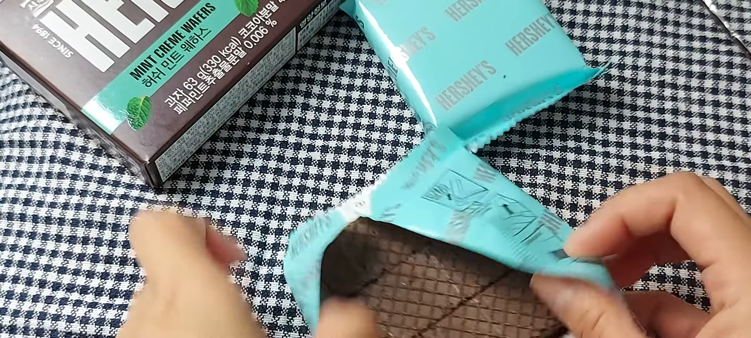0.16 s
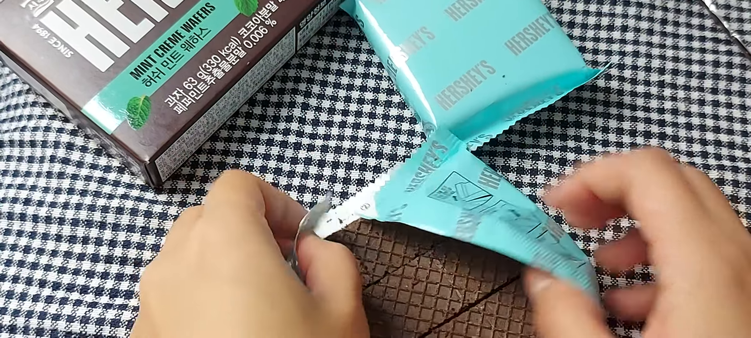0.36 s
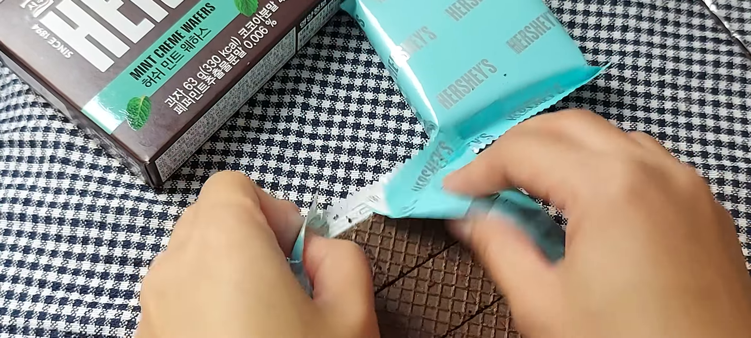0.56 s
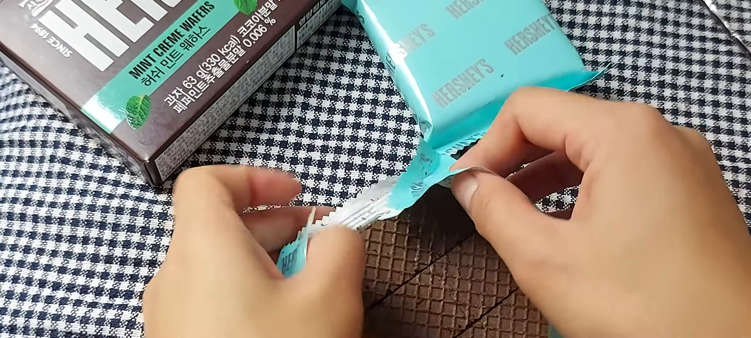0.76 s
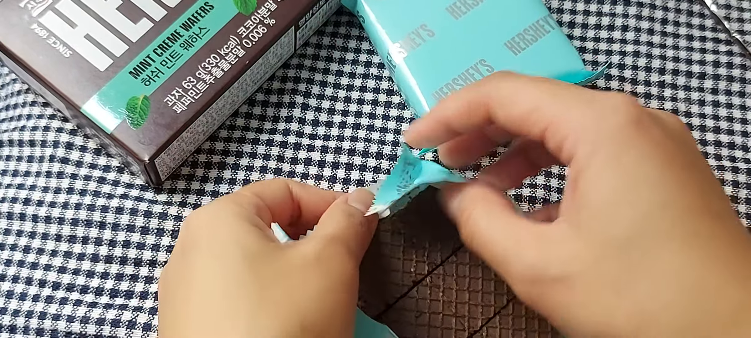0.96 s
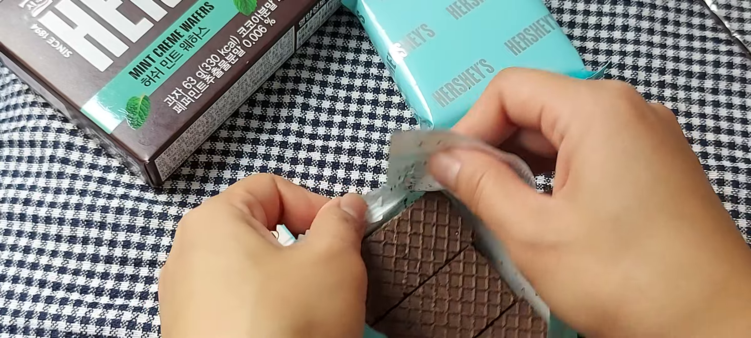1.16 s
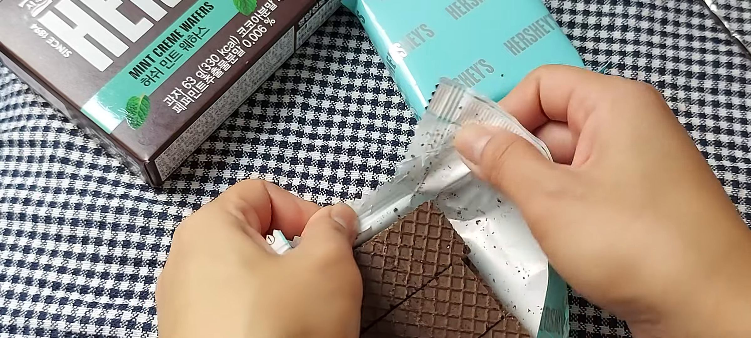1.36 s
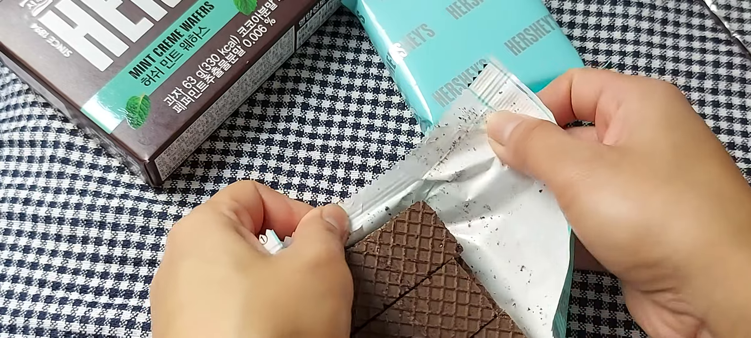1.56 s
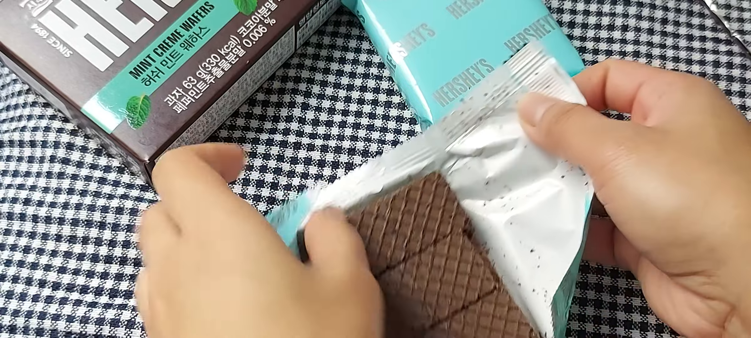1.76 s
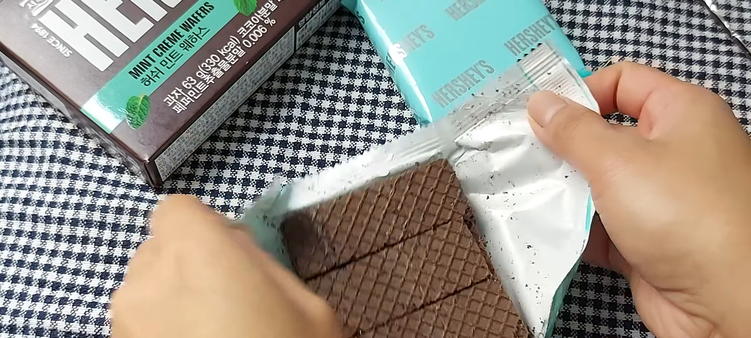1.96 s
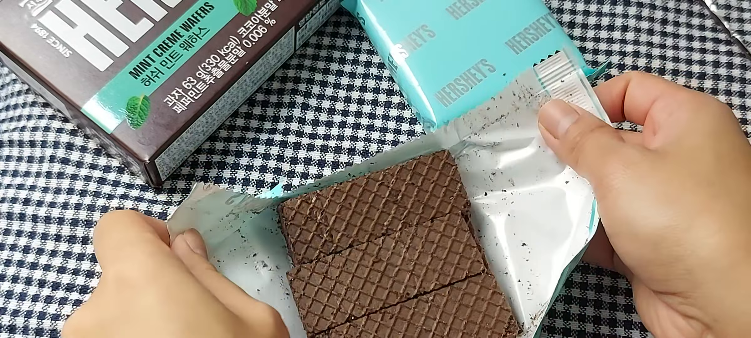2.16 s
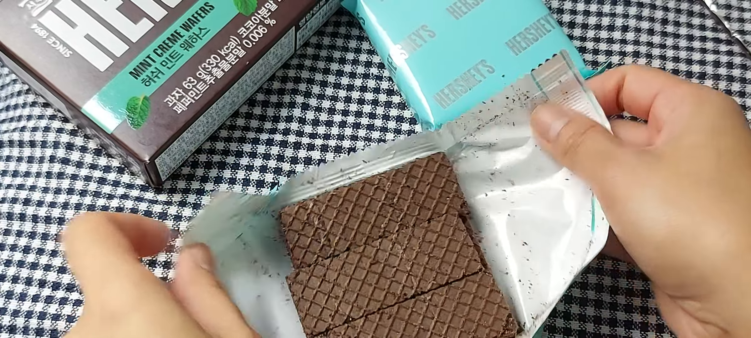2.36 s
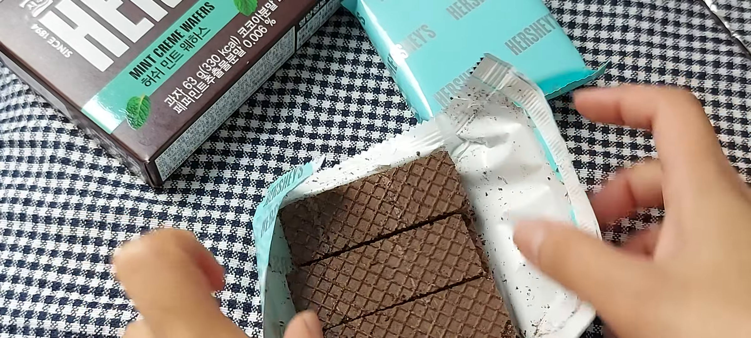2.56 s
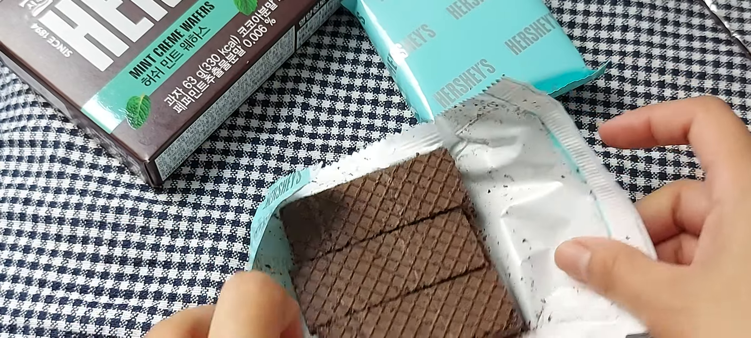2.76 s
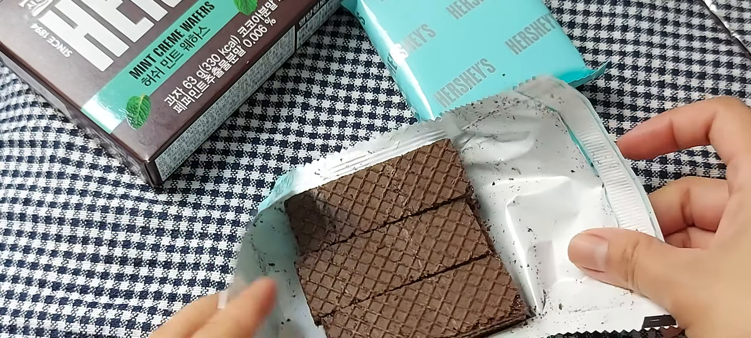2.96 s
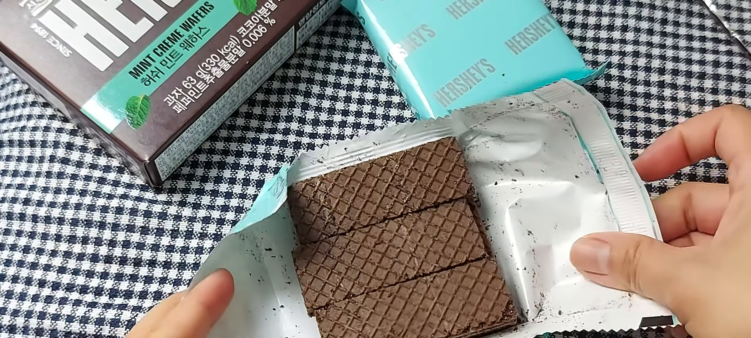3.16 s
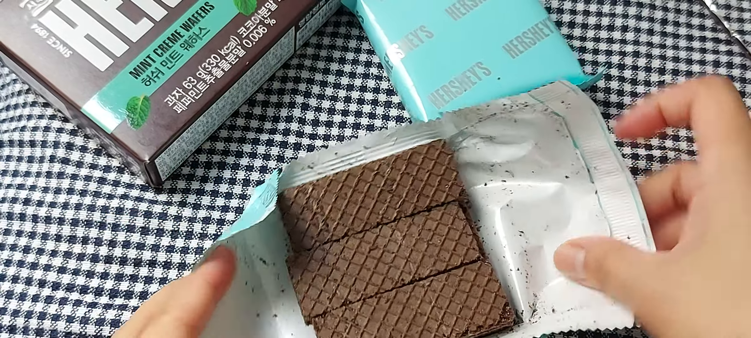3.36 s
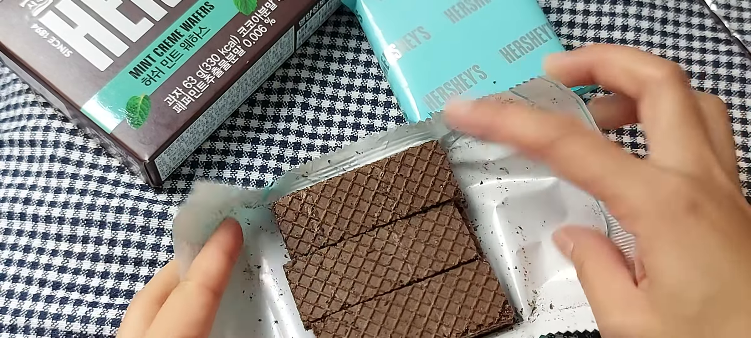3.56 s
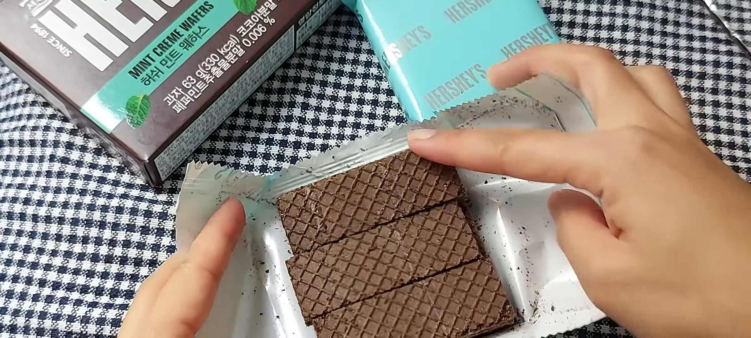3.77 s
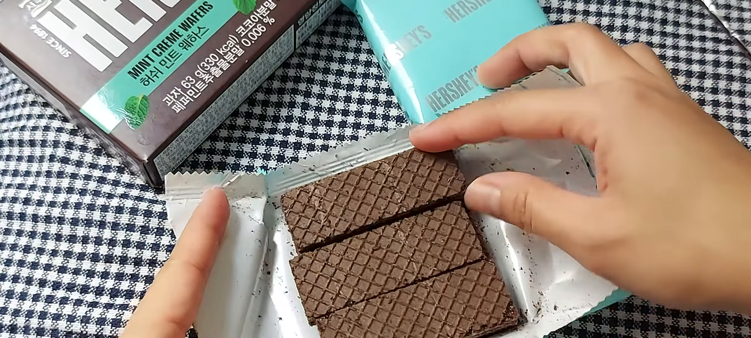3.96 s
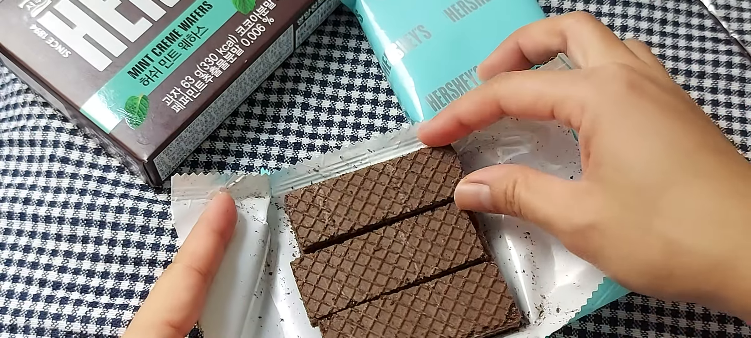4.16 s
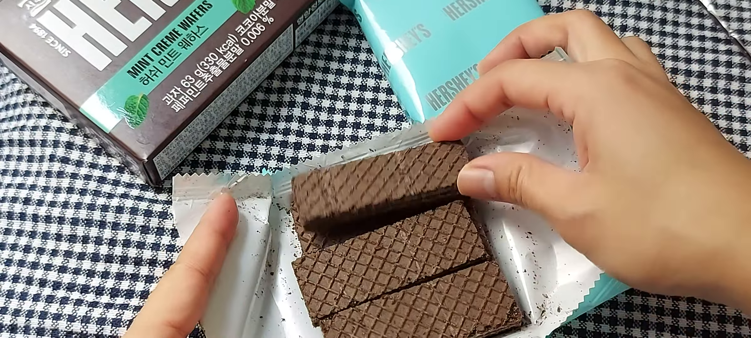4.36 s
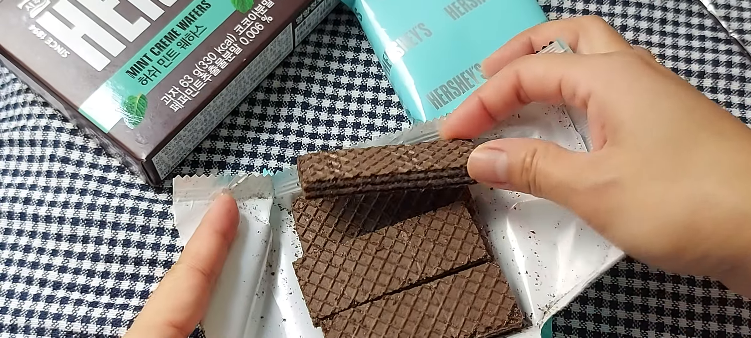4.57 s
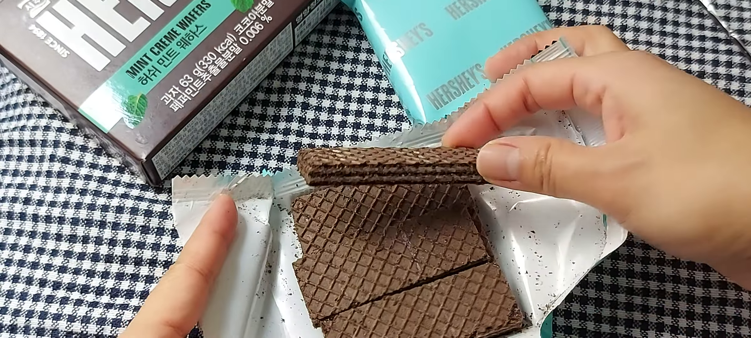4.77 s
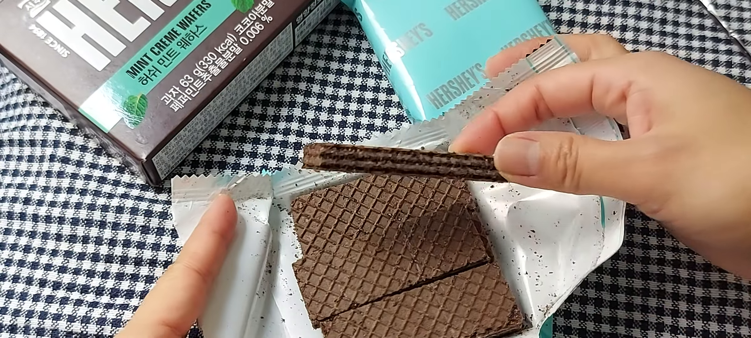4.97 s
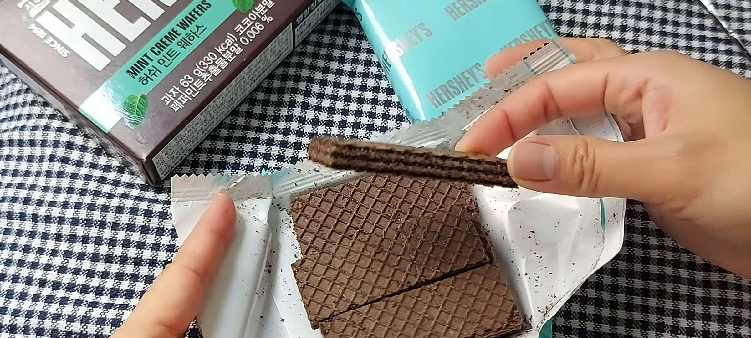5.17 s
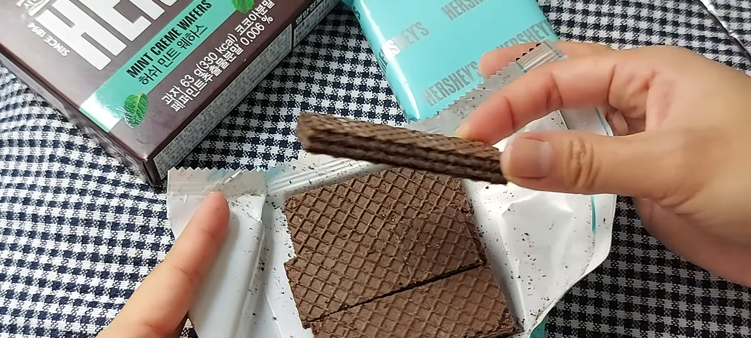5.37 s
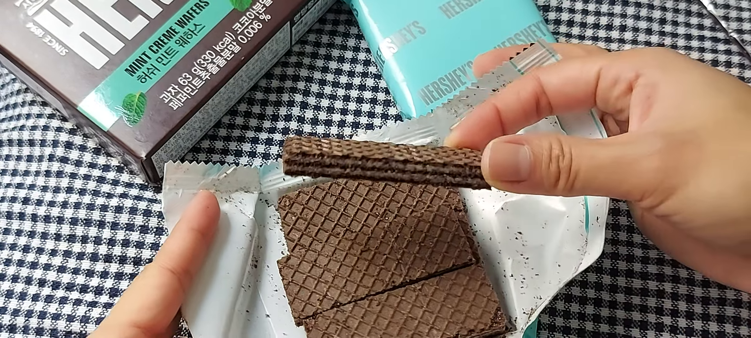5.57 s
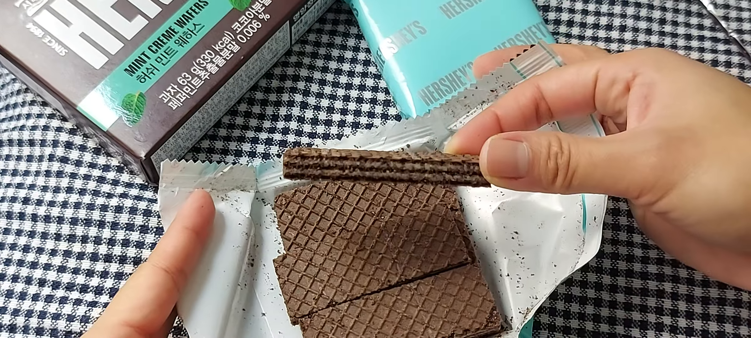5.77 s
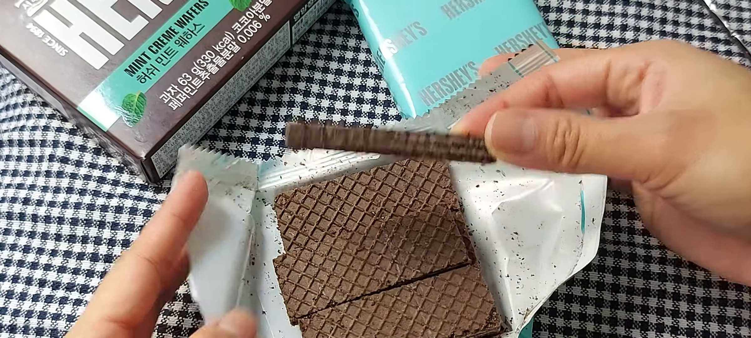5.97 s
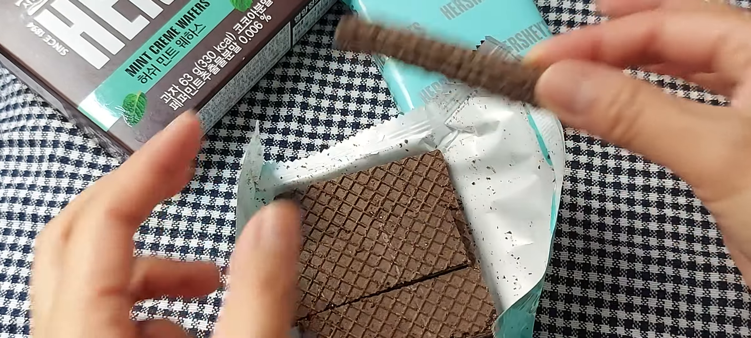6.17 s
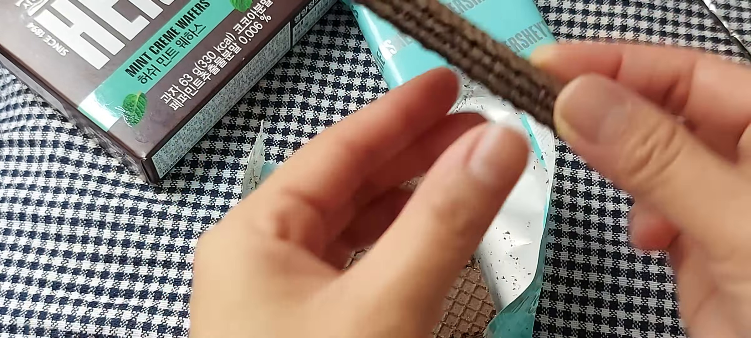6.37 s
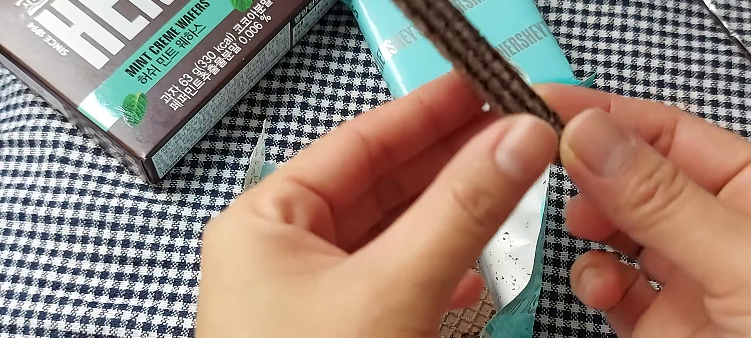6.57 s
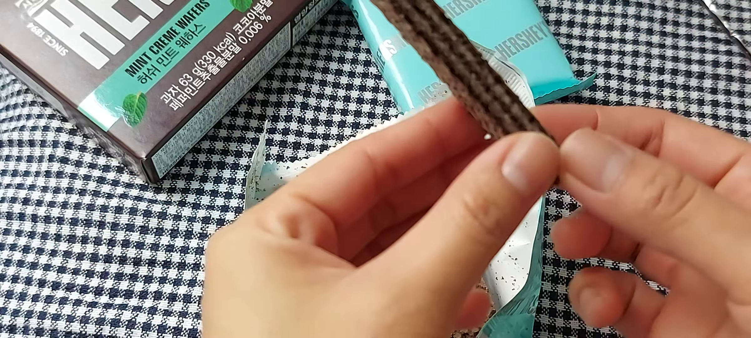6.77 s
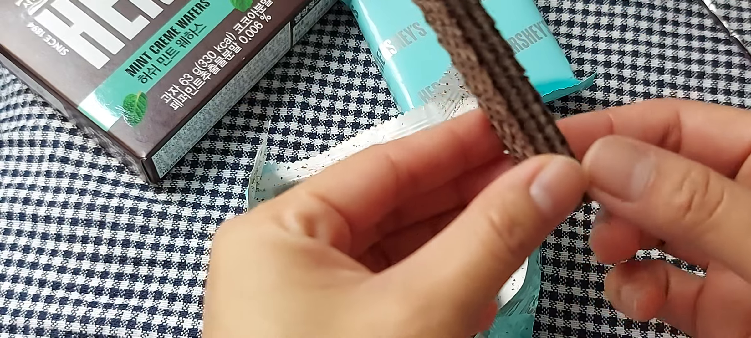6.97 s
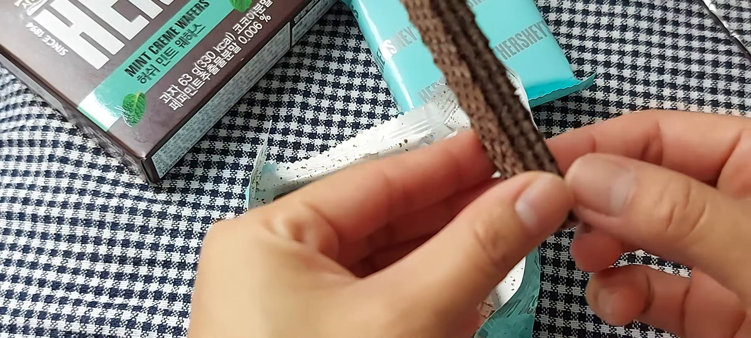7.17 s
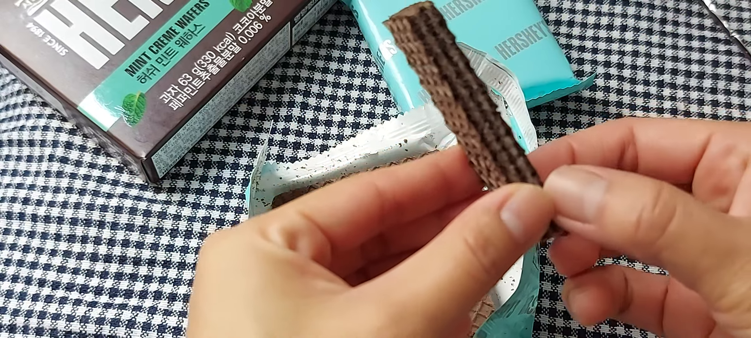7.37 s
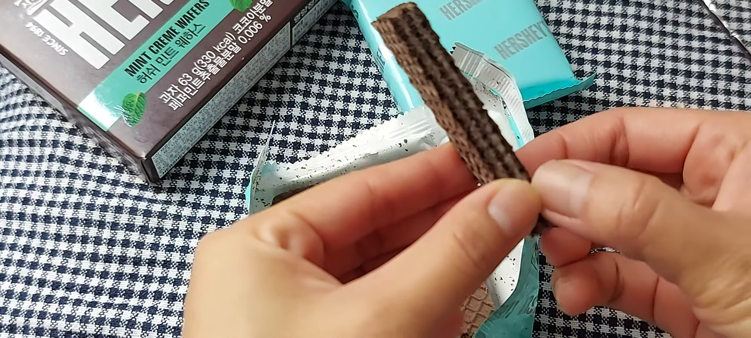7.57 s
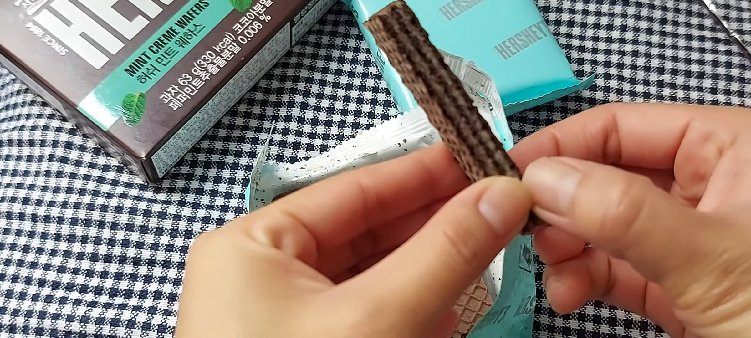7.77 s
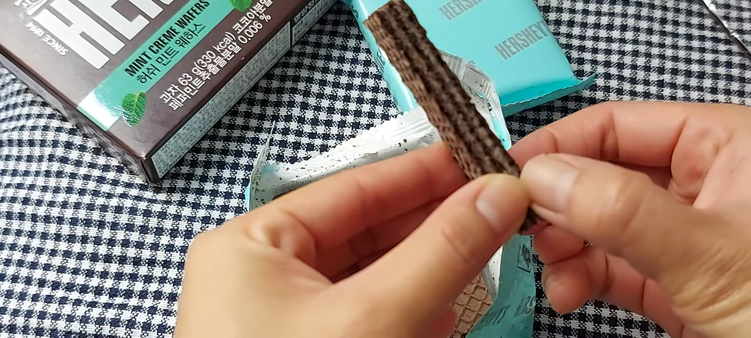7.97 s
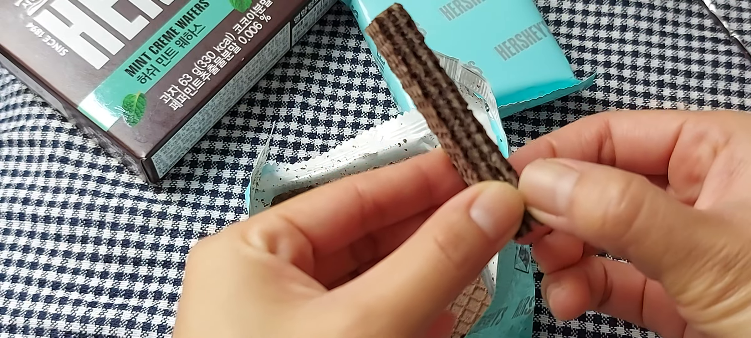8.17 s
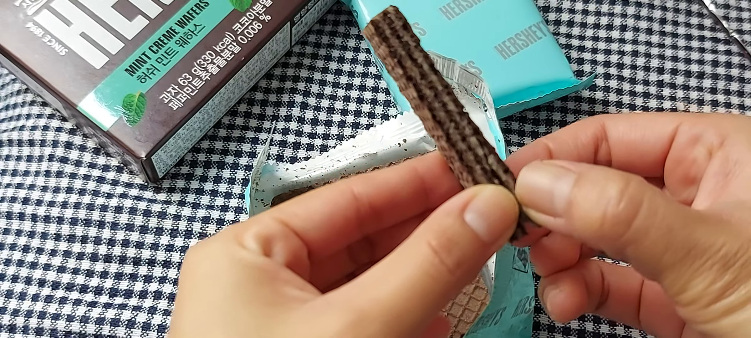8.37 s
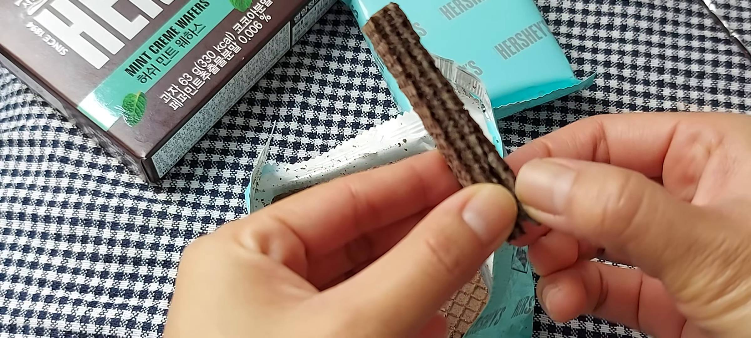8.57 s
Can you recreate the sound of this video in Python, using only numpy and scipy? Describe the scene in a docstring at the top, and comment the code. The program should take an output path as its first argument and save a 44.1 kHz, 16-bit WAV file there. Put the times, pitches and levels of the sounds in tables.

```python
"""Stiff film snaps sharply over a finer crinkle, with a few dull knocks; later come faint ticks and rubbing.
Hands peel open a foil-lined snack wrapper with a wafer in it, close to a stereo microphone.
Each snap is a spike and a short noisy flutter, coloured by the ringing panel of film.
Knocks are dying sine waves; crinkle and rubbing are streams of tiny random snaps.
A small room answers, made of fading noise; an appliance hums as narrow bands of noise in soft air noise."""
import sys
import numpy as np
from scipy import signal
from scipy.fft import rfft, irfft, next_fast_len
from scipy.io import wavfile
from scipy.ndimage import uniform_filter1d

SR = 44100
rng = np.random.default_rng(int(sys.argv[2]) if len(sys.argv) > 2 else 0)


def bounce(signal):
    """Save signal as a 16-bit WAV file at the path given by the first command-line argument."""
    frames = np.transpose(np.atleast_2d(signal))
    limited = np.clip(frames, -1, 1)
    pcm = np.round(limited * 32767).astype(np.int16)
    wavfile.write(sys.argv[1], SR, pcm)


N = 380141

# Creases snapping through; each frees a panel of film that rings:
# (time [s], direct energy [dB], panel pitch [Hz], panel ring [dB], brightness [dB per octave],
#  room level relative to direct [dB])
FOLDS = [(0.008, -6.5, 5000, 7, -2, -6), (0.051, -11.5, 7860, 0, 1, 2), (0.082, -12, 1450, 0, -3.1, 2.5),
         (0.105, -4.5, 12500, 9, -0.8, -5), (0.1597, -10.5, 990, 6.5, 0.3, 4),
         (0.281, -17.5, 11380, 8, -1.5, 3), (0.328, -12.5, 840, 13.5, -3.5, 4),
         (0.3517, -6, 5660, 2.5, -2, 2.5), (0.6475, -15, 12300, 20, -5, 5),
         (0.6664, -5, 1400, 9.5, -1, 0.5), (0.6977, -15, 900, 10, -2.5, -1),
         (1.1442, -3, 1300, 6, 1.45, 4.5), (1.254, -6.5, 5720, 0, 0.5, -1),
         (1.359, -15.5, 1600, 9.5, -0.5, -8), (1.3834, -8, 1450, 19, 3, -8), (1.3907, 1, 1690, 8, 2, -1),
         (1.466, 6, 1050, 9, 0.7, -3.5), (1.52, -3.5, 1220, 20.5, -4, -12),
         (1.531, -4, 5720, 2.5, -1, -0.5), (1.5359, -6, 1260, 29.5, 2, -17),
         (1.621, -20, 3870, 11, -5, -72.5), (1.7363, 0.5, 1840, 4.5, 0.75, -2.5),
         (1.865, -22, 2760, 8, -4, -2.5), (2.0373, -20.5, 5200, 4.5, -2.5, 6),
         (2.106, -14, 6630, 8.5, -3, -1.5), (2.1413, -15.5, 1610, 4, 0, 4.5),
         (2.1754, 0, 1750, 8, -1, -2.5), (2.2122, 3, 1490, 3, 1.5, -2), (2.238, -6.5, 1530, 9, -1.5, -6.5),
         (2.437, -11.5, 1890, 1.5, -0.3, 6.5), (2.474, -3, 9210, 2.5, -0.1, 3),
         (2.597, -18, 7070, 1.5, 0.8, -1), (2.7297, -20.5, 1610, 6.5, -0.7, 5),
         (2.8005, -3.5, 4450, 11, 0.5, -1.5), (2.8359, -2, 3800, 3, 1.0, -1.5),
         (2.998, -0.5, 2330, 9.5, 5, -1.5), (3.062, -4.5, 2130, 7.5, -1.7, 0),
         (3.2163, -5, 1980, 8.5, 1.4, -2), (3.3311, -21.5, 1700, 11, -6, 1),
         (3.3632, -9.5, 10800, 5, 1.7, -2.5), (3.495, -3.5, 6540, 7.5, 2.7, -5),
         (3.5884, -18, 2730, -3, -2.2, -1.5), (3.6374, -7, 9500, 11, -0.5, -5),
         (3.7015, -17.5, 3800, 1, -4, 1.5), (3.8234, -18.5, 2740, 13, -6, 0),
         (4.009, -2, 5700, 11.5, 0.7, 1.5), (4.1085, -6.5, 11300, 7.5, -2, -3),
         (4.3443, -21, 4960, 18, -3, -12), (4.5873, -24, 2290, 14, 3.5, 3),
         (4.655, -23, 2960, 12, -5.5, -2.5), (4.8292, -15, 2700, 3, 1.4, -2),
         (6.0426, -24, 8700, 11, -4.5, 2), (6.0606, -22, 1000, 10, -3, -0.5),
         (6.1217, -25.5, 1900, 5, -2.5, 9), (6.4283, -37.5, 1050, 14.5, -5.5, 8.5),
         (6.525, -28, 2340, 7, -6.4, 3.5)]


def amp(db):
    """Turns decibels into a gain."""
    return 10 ** (np.asarray(db) / 20)


def unit(x):
    """Scales a sound to an rms level of 1."""
    return x / np.sqrt(np.mean(x ** 2) + 1e-20)


def unit_energy(x):
    """Scales each channel to an energy of 1."""
    return x / np.linalg.norm(x, axis=-1, keepdims=True)


def along(points, hz):
    """Reads a curve of (frequency, value) points, spacing frequency logarithmically."""
    point_hz, value = np.transpose(points)
    return np.interp(np.log(hz + 1), np.log(point_hz + 1), value)


def filtered(x, response):
    """Multiplies the spectrum of x by a response, given as a function of frequency."""
    size = next_fast_len(N + SR // 2)  # spare room at the end
    spectrum = rfft(x, size) * response(np.fft.rfftfreq(size, 1 / SR))
    return irfft(spectrum, size)[..., :N]


def causal(gain):
    """Builds the minimum-phase response: this gain, with the energy as early as possible."""
    cepstrum = irfft(np.log(gain + 1e-6))
    half = len(cepstrum) // 2
    cepstrum[1:half] *= 2
    cepstrum[half + 1:] = 0
    return np.exp(rfft(cepstrum))


def add(track, s, sound):
    """Mixes a sound into a track, starting at time s in seconds."""
    start = max(round(s * SR), 0)
    part = track[:, start:][:, :sound.shape[1]]
    part += sound[:, :part.shape[1]]


def snap(colour, hz, flutter_db=7.5, flutter_t60=.0085, own_db=-4, lead_s=.0001, spread_s=.00005):
    """One crease flips: a sharp spike, then the film flutters for a few milliseconds."""
    t = np.arange(2 * len(hz) - 2) / SR
    shared = rng.standard_normal(len(t))
    own = rng.standard_normal((2, len(t)))  # different on each side of the microphone
    flutter = unit_energy((shared + amp(own_db) * own) * amp(-60 * t / flutter_t60))
    spike = rng.choice([-1, 1])
    flip = spike + amp(flutter_db) * rfft(flutter)
    # dividing by the smoothed spectrum leaves only the flutter's fine ripples in the colour
    broad = np.sqrt(np.abs(uniform_filter1d(np.abs(flip) ** 2, size=30, axis=1)))
    # each crease lies at its own angle, so it reaches one side first, usually the left
    lead = lead_s + spread_s * rng.standard_normal()
    delay = np.maximum([[-lead], [lead]], 0)
    return unit_energy(irfft(flip / broad * colour * np.exp(-2j * np.pi * hz * delay)))


def snaps(beam_db=0.98, panel_octaves=.4, size=2048):
    """Creases snap and faint ticks sound as the film relaxes; the film beams its treble at the microphone."""
    # Faint ticks of the film relaxing: (time [s], direct energy [dB])
    tick_list = [(4.275, -33), (4.894, -29), (5.387, -24.5), (6.261, -31.5), (7.224, -39.5), (7.569, -38),
                 (7.728, -41), (7.772, -37), (8.333, -46.5), (8.369, -45.5)]
    # Microphone colour: (frequency [Hz], gain [dB])
    microphone = [(25, -37), (120, -10.5), (320, 7), (720, 1), (1150, 5), (2050, 8.5), (4600, 8),
                  (6900, 3.5), (9100, 3), (11500, 4.5), (13800, 0.5), (15800, -5)]
    # every tick: panel pitch [Hz], ring [dB], brightness [dB per octave], room level relative to direct [dB]
    tick_film = (11490, 13, 1, -2.5)
    ticks = [(s, db, *tick_film) for s, db in tick_list]
    direct, wet = np.zeros((2, 2, N))
    hz = np.fft.rfftfreq(size, 1 / SR)
    for s, db, panel_hz, ring_db, bright_db, wet_db in list(FOLDS) + ticks:
        octaves = np.log2(np.maximum(hz, 300) / panel_hz)  # the tilt stops below 300 Hz
        panel = ring_db * np.exp(-.5 * (octaves / panel_octaves) ** 2)
        colour = amp(bright_db * octaves + panel + along(microphone, hz))
        beamed = causal(colour * amp(beam_db * octaves))  # beam_db is in dB per octave
        add(direct, s, amp(db) * snap(beamed, hz))
        into_room = unit_energy(irfft(causal(colour)))
        add(wet, s, amp(db + wet_db) * echo(into_room))
    return direct + room_ring(wet)


def handling(crinkle_db=-1, rub_db=-1.0):
    """Small creases crackle as the film moves; skin and wafer rub on the foil."""
    # Colour of the crinkle: (frequency [Hz], relative gain [dB])
    crinkle = [(30, -29), (150, -8.5), (400, 0), (1400, 5), (2600, 3), (5000, -1.5), (8000, -13.5),
               (16000, -30)]
    # Colour of the rubbing: (frequency [Hz], relative gain [dB])
    rub = [(1000, -21.5), (4000, -6.5), (7000, -5.5), (9700, -5.5), (12000, -3), (15700, -9)]
    crackle = amp(crinkle_db) * grains(rate=130, uneven_db=5.0, spectrum=crinkle, wet_db=3)
    hiss = amp(rub_db) * grains(rate=800, uneven_db=4.5, spectrum=rub, wet_db=-1.5)
    return stirring() * (crackle + hiss)


def grains(rate, uneven_db, spectrum, wet_db, count=6, size=512):
    """Tiny slips of uneven size, rate per second, on a few patches of film, with echo; rms 1."""
    sizes = amp(uneven_db * np.minimum(rng.exponential(size=N), np.pi)) * rng.choice([-1, 1], N)
    slips = sizes * (rng.random(N) < rate / SR)
    patch = rng.integers(count, size=N)
    hz = np.fft.rfftfreq(size, 1 / SR)
    direct = np.zeros((2, N))
    for k in range(count):
        on_patch = (slips * (patch == k))[None]
        direct += signal.oaconvolve(on_patch, snap(1, hz), axes=1)[:, :N]
    wet = amp(wet_db) * room_ring(echo(slips))
    return unit(filtered(direct + wet, lambda f: amp(along(spectrum, f))))


def stirring():
    """How much the film moves: finger effort, strain before each snap, a flurry after it, and slides."""
    # How hard the fingers work the film while peeling: (time [s], relative effort [dB])
    effort = [(0, -38), (.1, -46.5), (.45, -50.5), (.62, -50.5), (.8, -58), (1.2, -58), (1.4, -51),
              (1.62, -68), (1.98, -61.5), (2.1, -62.5), (2.35, -63), (2.54, -41), (2.68, -65.5),
              (2.92, -54.5), (3.15, -69), (3.68, -54.5), (3.82, -67), (4.0, -53.5), (4.27, -77.5)]
    # Fingers or wafer slide over the foil: (time [s], length [s], relative level [dB])
    slides = [(0.844, 0.046, -46), (0.985, 0.069, -48), (2.86, 0.047, -50), (3.39, 0.056, -44),
              (4.28, 0.3, -56), (4.738, 0.23, -62), (5.22, 0.45, -70.5), (5.974, 0.12, -57),
              (7.68, .1, -78)]
    strain_db, strain_build_s = -49, 0.023  # small creases giving way before a snap, relative to it
    flurry_db, flurry_decay_s = -49.5, 0.078  # small creases settling after a snap, relative to it
    swell, release_s = 0.28, 0.079  # share of a slide spent speeding up; its dying away
    t = np.arange(N) / SR
    age = t[:SR]
    # powers add up, so every gain is squared
    power = amp(np.interp(t, *np.transpose(effort), right=-np.inf))[None] ** 2
    for s, db, *_ in FOLDS:
        ahead = s - t[:round(s * SR)][-SR // 4:]  # time left until the snap
        strain = amp(db + strain_db) * np.exp(-ahead / strain_build_s)
        add(power, s - ahead[0], strain[None] ** 2)
        flurry = amp(db + flurry_db) * np.exp(-age / flurry_decay_s)
        add(power, s, flurry[None] ** 2)
    for s, length, db in slides:
        rise = np.minimum(age / (swell * length), 1)
        fall = np.exp(-np.maximum(age - length, 0) / release_s)
        add(power, s, (amp(db) * rise * fall)[None] ** 2)
    return np.sqrt(power)


def knocks(t60=0.022, attack_s=0.00029, wet_db=-9):
    """The wafer slab knocks dully: a sine wave that dies within a few cycles, with its echo."""
    # Dull knocks of the wafer slab in the wrapper: (time [s], direct energy [dB], pitch [Hz])
    knock_list = [(0.33, -16.5, 300), (0.668, -14, 275), (2.475, -14.5, 490), (4.101, -12.5, 360)]
    out = np.zeros((2, N))
    t = np.arange(SR // 20) / SR
    for s, db, hz in knock_list:
        envelope = amp(-60 * t / t60) * (1 - np.exp(-t / attack_s))
        knock = amp(db) * unit_energy(np.sin(2 * np.pi * hz * t) * envelope)
        add(out, s, knock[None])
        add(out, s, amp(wet_db) * echo(knock))
    return out


def echo(x, build_s=0.0014, early_db=3.5, early_s=0.016, size=16384):
    """The room's answer: strong early reflections, then each frequency dies at its own speed."""
    # Echo decay: (frequency [Hz], time to fall by 60 dB [s])
    room = [(200, 0.76), (800, 0.28), (2000, 0.29), (5500, 0.23), (16000, 0.29)]
    hz, t, z = signal.stft(stereo_noise(size), SR, nperseg=256)
    decay = amp(-60 * t / along(room, hz)[:, None])
    tail = signal.istft(z * decay, SR, nperseg=256)[1]
    t = np.arange(tail.shape[1]) / SR
    build = 1 - np.exp(-(t / build_s) ** 2)
    early = amp(early_db * np.exp(-t / early_s))
    tail = unit_energy(tail * build * early)
    return signal.fftconvolve(x[None], tail, axes=1)[:, :N]


def room_ring(x, width_hz=16):
    """Some frequencies stand out in the room, a few are slightly weakened."""
    # Modes of the room: (frequency [Hz], gain at the centre if it stood alone [dB])
    room_modes = [(668, 6.5), (888, 5.5), (1125, 4), (1185, 0), (1319, -1.5), (1443, -2), (2078, -2),
                  (2369, 1.5), (3170, 6), (3622, -1.5)]

    def response(f):
        """Flat, plus a narrow peak or slight dip at each mode; 0 dB changes nothing."""
        total = 1
        for centre, db in room_modes:
            damping = 1j * f * width_hz
            total = total + (amp(db) - 1) * damping / (centre * centre - f * f + damping)
        return total

    return filtered(x, response)


def stereo_noise(length):
    """Noise from all around: alike on both sides in the bass, mostly unrelated in the treble."""
    # Left-right likeness: (frequency [Hz], correlation [1 = the same])
    alike = [(60, 0.83), (150, 0.85), (300, 0.89), (700, 0.25), (2000, 0.16), (8000, 0.2)]
    likeness = along(alike, np.fft.rfftfreq(length, 1 / SR))
    turn = np.arccos(np.clip(likeness, -1, 1)) / 2
    spectra = rfft(rng.standard_normal((2, length)))
    mid, side = irfft(spectra * [np.cos(turn), np.sin(turn)], length)
    return np.array([mid + side, mid - side])


def background(air_db=-55.5):
    """A wavering appliance hum, made of narrow bands of noise, in soft room air."""
    # The appliance's tones: (frequency [Hz], width [Hz], level [dB])
    hum = [(59, 4.1, -63.5), (90.1, 7.7, -54), (161, 12, -63), (200, 2, -68), (225.2, 2.9, -65),
           (257.5, 4.5, -70.5), (309.9, 20, -60), (445, 2, -73)]
    # Colour of the room air: (frequency [Hz], relative level [dB per Hz])
    air_colour = [(20, -23.5), (36, -7.5), (70, -5), (110, -1), (135, -4.5), (300, -2.5), (420, -8),
                  (600, -14.5), (1150, -21), (1700, -32), (3100, -37.5), (4200, -46.5), (7000, -47.5),
                  (11500, -37), (16000, -45)]
    hiss = filtered(stereo_noise(next_fast_len(N)), lambda hz: amp(along(air_colour, hz)))
    out = amp(air_db) * unit(room_ring(hiss))
    for centre, width, db in hum:
        noise = rng.standard_normal(N)
        tone = filtered(noise, lambda hz: 1 / (1 + 2 * ((hz - centre) / width) ** 2))
        out = out + amp(db) * unit(tone)  # the same on both sides
    return out


def scene(left_db=.5):
    """Wrapper, wafer and room together, a little louder on the left."""
    mix = snaps() + handling() + knocks() + background()
    return mix * amp([[left_db], [-left_db]])


def record(dry, top_hz=15950):
    """The recorder cuts very steeply above its band limit."""
    return filtered(dry, lambda hz: 1 / np.sqrt(1 + (hz / top_hz) ** 240))


dry = scene()
out = record(dry)
bounce(out)
```